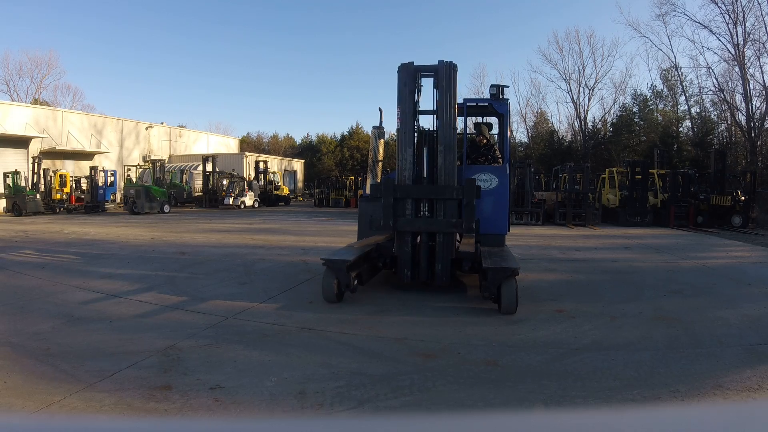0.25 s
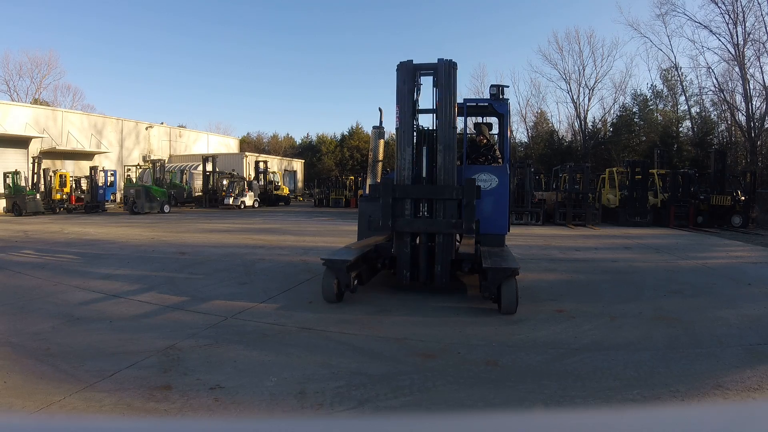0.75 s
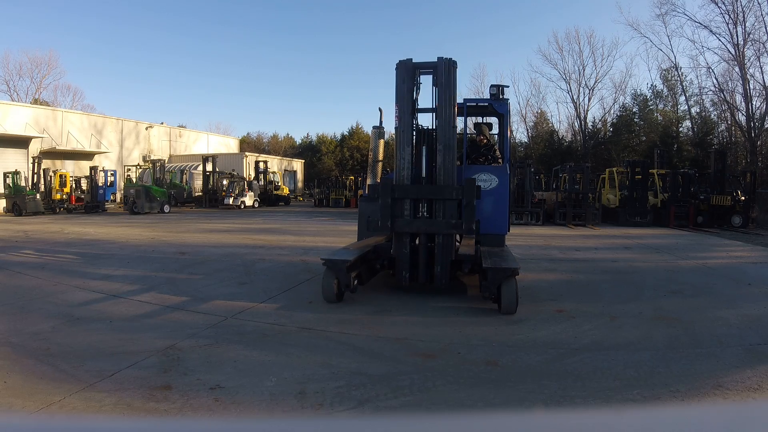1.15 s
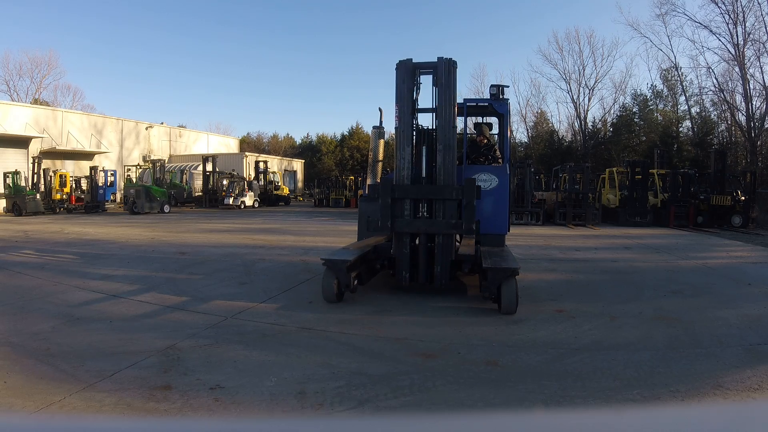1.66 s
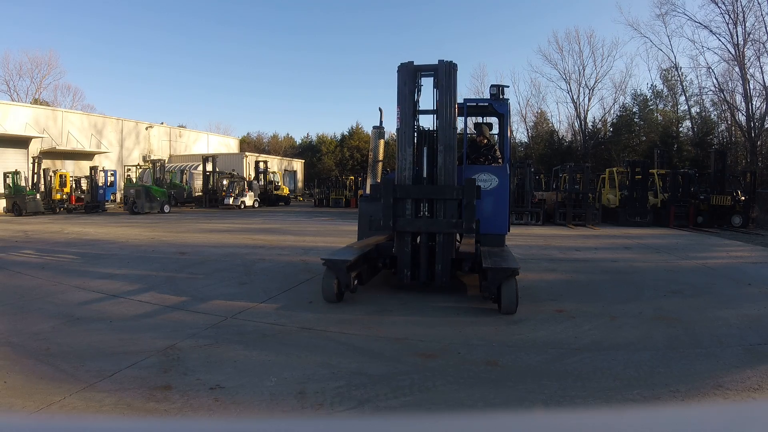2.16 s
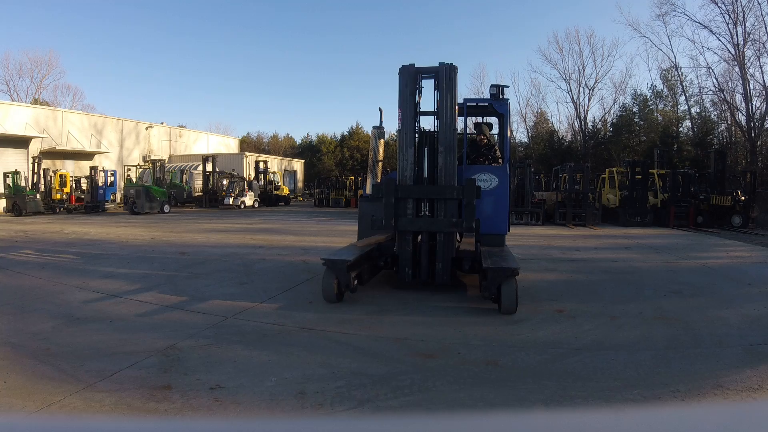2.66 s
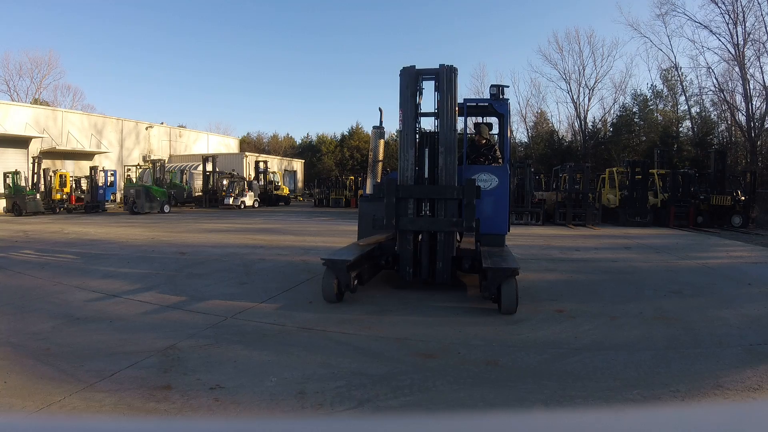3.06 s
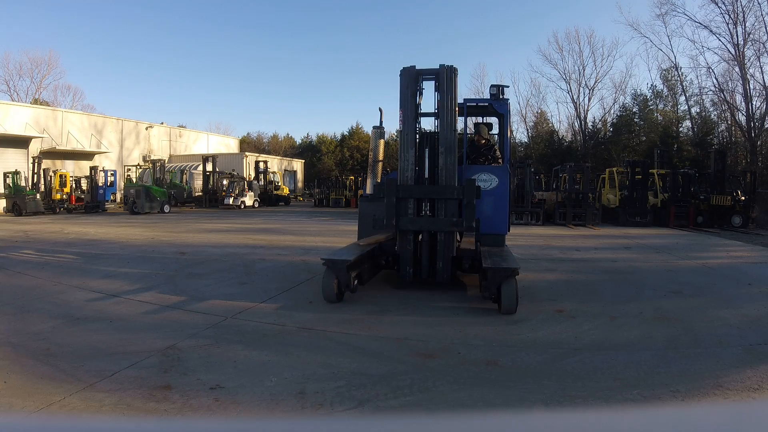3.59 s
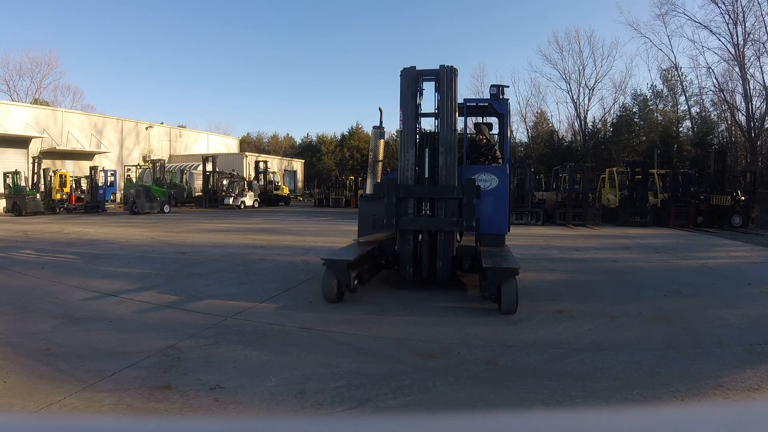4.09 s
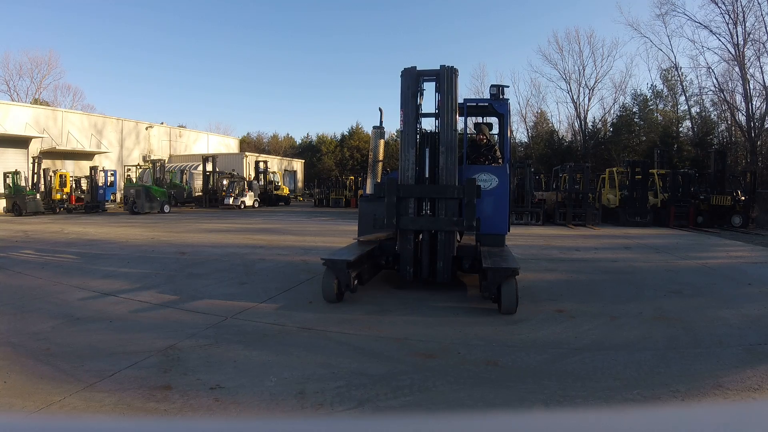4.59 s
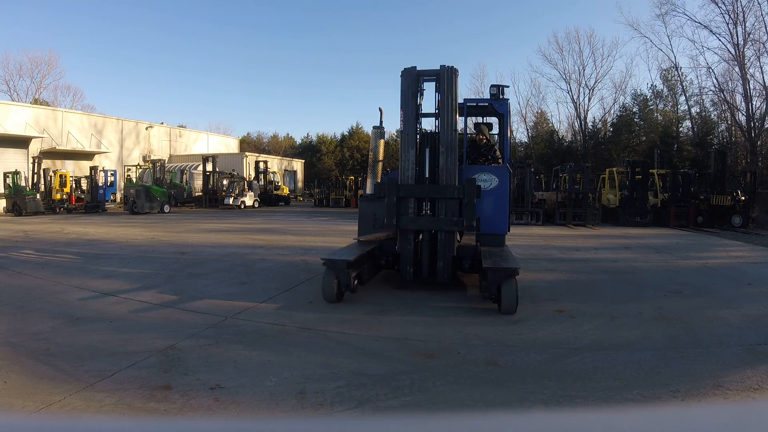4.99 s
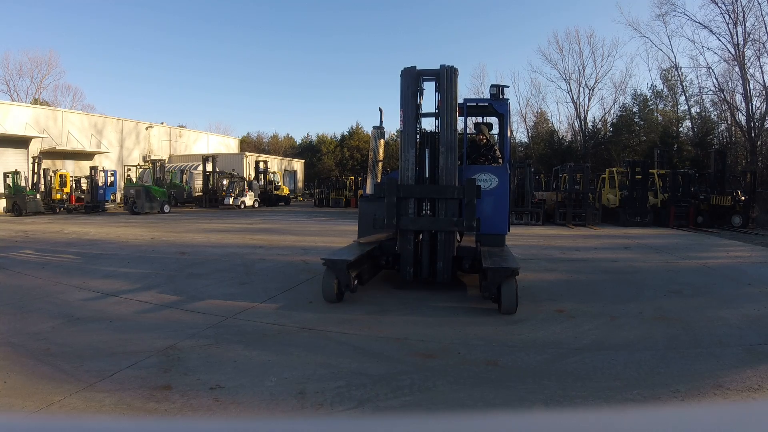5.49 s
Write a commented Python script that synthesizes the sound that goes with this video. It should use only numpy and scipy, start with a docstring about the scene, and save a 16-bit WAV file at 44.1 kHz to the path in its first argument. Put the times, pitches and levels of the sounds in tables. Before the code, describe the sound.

A forklift's diesel engine drones fast and steady with a whining pump, then strains, revs, nearly stalls and recovers in an outdoor yard.

```python
"""A fast, steady engine boom comes first, with fan hum, pump whine, knock and oil hiss: a forklift in a yard.
Small mast clicks follow as the hydraulics work; the engine sags, revs again, nearly stalls and recovers.
Boom, hum, whine and gears are sines locked to one crankshaft; knock is noise in a burst at each firing.
Rumble, fan air, valve chatter and oil are coloured noise; clicks are ringing bands of noise.
Machinery rings through steel resonances; knock, oil and clicks also reflect in the yard."""
import sys
import numpy as np
from scipy import signal
from scipy.fft import rfft, irfft
from scipy.io import wavfile

SR = 44100
rng = np.random.default_rng(int(sys.argv[2]) if len(sys.argv) > 2 else 0)


def materialize(psi):
    """Save the field psi as 16-bit PCM at rate SR to the path in sys.argv[1].

    A 1-D psi becomes a single channel; in a 2-D psi each row is a channel.
    """
    bounded = np.clip(np.atleast_2d(psi).T, -1, 1)
    quanta = np.round(bounded * 32767).astype(np.int16)
    wavfile.write(sys.argv[1], SR, quanta)


N = 253134
TIME = np.arange(N) / SR
BINS = np.fft.rfftfreq(N, 1 / SR)

# engine speed: (t/s, firing rate f/Hz)
SPEED = [(0.0, 99.8), (1.2, 99.6), (1.45, 102.9), (1.69, 103.7), (1.84, 94.6), (2.13, 88.8), (2.78, 86.5),
         (3.18, 88.3), (3.56, 101.0), (3.95, 104.9), (4.08, 92.8), (4.25, 81.2), (4.43, 59.9), (4.6, 51.1),
         (4.77, 76.2), (5.03, 92.4), (5.35, 79.3), (5.74, 73.3)]
# load on the engine: (t/s, share of full load 0-1)
LOAD = [(0, 0.23), (1.1, 0), (1.85, 0.25), (2.15, .65), (2.8, 0.74), (3.25, .92), (3.6, 0.75), (3.9, 0.9),
        (5.3, 1), (5.74, .88)]

# A level law is (level/dB at governed speed without load, dB per doubling of speed, dB added by full load).
# A colour is (f/Hz, relative density level/dB); an order is a multiple of the named rate.

# exhaust boom: (multiple of the crank rate, level/dB without load, dB added by full load)
BOOM_ORDERS = [(1, -29, 9), (2, -26.5, 10.5), (3, -34, 12.5)]
# exhaust pipe resonance: (f/Hz, level/dB)
PIPE = [(27, -11), (38, -9), (50, -11.5), (63, -10), (76, -1.5), (83, 0), (90, -.3), (94, -4), (100, -7),
        (112, -11), (130, -19), (155, -15)]
# wavering of the boom from uneven burning: (depth/dB, rate f/Hz)
WAVER = (0.59, 14)
# weaker engine lines between and above the boom: level law
CYCLE_LINES = (-48, -9, 0.93)
# weaker engine lines: (multiple of the four-stroke cycle rate, relative level/dB)
CYCLE_ORDERS = [(3, -3), (5, -4.5), (7, -0.5), (8, 0), (9, -17), (10, -9), (11, -8.5), (12, -4),
                (24, -10.5)]
# engine bay rumble: level law, then colour
RUMBLE = (-36.5, 3.8, .3)
RUMBLE_COLOUR = [(10, -20), (22, -3), (45, -4.5), (70, -9), (120, -5), (160, 0), (200, -1), (245, -10),
                 (300, -17), (380, -28), (700, -50)]
# droning panel: (f/Hz, flutter rate f/Hz, level/dB before flutter)
PANEL = (156, 1.6, -43)
# fan blade tones: level law
HUM = (-45.5, 17.6, -1.5)
# fan blade tones: (multiple of the blade rate, relative level/dB without load, dB added by full load)
FAN_ORDERS = [(1, 0, -.5), (2, -6.5, 4.5), (3, -12.5, 0), (4, -15, 0.5)]
# fan shroud resonance: (centre f/Hz, half width f/Hz, dB added)
SHROUD = (327, 63, 7.8)
# fan air: level law, then colour
ROAR = (-39.5, 10.8, -0.33)
ROAR_COLOUR = [(150, -29), (290, 4.5), (400, -2.5), (520, -4), (680, -3), (900, -8.5), (1300, -13),
               (1700, -21), (2100, -24.5), (2700, -26), (3400, -35.5), (4300, -39.5), (8000, -40.5)]
# pump whine: level law
WHINE = (-50.5, 6.1, -1.7)
# pump body: (multiple of the stroke rate, relative level/dB)
PUMP_ORDERS = [(1, -2), (2, -12), (4, -13), (5, -12.5), (6, -14), (8, -27), (11, -31), (13, -42), (20, -38),
               (21, -33), (23, -30), (31, -34)]
# pump housing resonance: (firing rate f/Hz, half width f/Hz, dB added)
HOUSING = (99.4, 2.7, 7)
# oil pressure ripple: level law
RIPPLE = (-75.5, 15, -1.2)
# oil pressure ripple: (multiple of the stroke rate, relative level/dB)
RIPPLE_ORDERS = [(4, 9.5), (6, 6), (11, -7.5), (12, -10), (13, -8), (17, -18), (19, -17), (20, -2.5),
                 (21, -7), (22, -5), (23, -6.5), (25, -5.5)]
# steel resonance that the ripple partials cross: (centre f/Hz, half width f/Hz, dB added)
STEEL_MODE = (6130, 180, 7.8)
# hydraulics at work raise the ripple: (start t/s, end t/s, dB added)
STROKES = [(1.33, 1.95, 7), (3.38, 3.8, 7)]
# gear whine: (multiple of the firing rate, relative level/dB)
GEAR_ORDERS = [(4.5, 21), (6, 13.5), (7.7, 12.5), (12.1, 12), (33, -11), (40, -7.5), (42, -3), (66.6, 5.5),
               (71, 4.5), (78.8, -4)]
# gears sing through the first heavy pull: (start t/s, end t/s, reference level/dB)
GEAR_PULL = (2.0, 4.3, -75)
# valve train chatter: colour
CHATTER_COLOUR = [(400, -19), (700, 5), (1000, -6), (1600, 2), (2100, -7.5), (2400, -9), (3000, -27),
                  (4300, -31)]
# piston knock: level law, then colour
KNOCK = (-60.5, -1, 0.79)
KNOCK_COLOUR = [(400, -26), (1100, -13), (1700, 10), (2100, 1.5), (2650, 6), (3200, 0), (4300, -20),
                (5900, -6.5), (6600, -28), (8000, -2), (11000, -12), (12000, -40)]
# knock of each cylinder in firing order: (relative level/dB)
CYLINDERS_DB = [-6, 0, -7, -1.5]
# oil flow: level law, then colour
HISS = (-55, -1.8, .4)
HISS_COLOUR = [(2000, -0.5), (3300, -7.5), (4300, -17.5), (4900, -8), (5500, -0.5), (6050, 3), (6550, -0.5),
               (7300, 3), (8500, -5), (9400, -4.5), (10900, -11.5), (11700, -19), (13500, -17),
               (15200, -28)]
# oil squirt through a valve: (peak level/dB, attack t/s, decay t/s), then colour
SQUIRT = (-51, 0.036, 0.06)
SQUIRT_COLOUR = [(2000, -14), (3800, -16), (5200, 7), (8500, 1.5), (10000, -7), (12000, -31)]
# oil fizz through the second pull, on past the end of the scene: (start t/s, end t/s, level/dB), then colour
FIZZ_PULL = (4.2, 7.4, -64)
FIZZ_COLOUR = [(7000, -10), (9300, -4), (10700, -2), (11800, -22), (13500, -16), (15000, -26)]
# steel panels and mast: (f/Hz, width f/Hz, level/dB of the ring against the direct sound)
FRAME = [(455, 25, -7), (560, 25, -10), (680, 40, -9), (850, 40, -9), (1060, 30, -9), (1230, 30, -8),
         (2265, 50, -9), (2610, 70, -4), (2940, 70, -8), (3297, 30, -3), (3490, 40, -8), (3740, 40, -11),
         (5280, 80, -11), (5855, 80, -5), (6160, 110, -4), (6900, 70, -12), (7500, 50, -9),
         (7950, 120, -12), (9320, 110, -11)]
# mast and linkage clicks: (t/s, level/dB, ring f/Hz, half width in octaves, t60 t/s)
CLICKS = [(1.2374, -39, 6060, .16, 0.027), (1.239, -44, 9100, .1, 0.026), (1.238, -47, 2980, 0.18, 0.046),
          (1.69, -43, 1800, 0.17, 0.09), (1.689, -42, 2220, 0.13, 0.073), (4.042, -44.5, 7970, .015, 0.077),
          (4.354, -38, 7760, 0.065, 0.037), (4.573, -49, 5800, .12, 0.045), (4.622, -48, 6500, 0.22, 0.042)]
# near a stall: (firing rate f/Hz where it begins, dip level/dB, throb level/dB)
LUGGING = (60, -2.4, 2.1)

GOVERNED_HZ = 100  # firings a second
CYLINDERS = 4  # firings in a four-stroke cycle
BLADES_PER_FIRING, STROKES_PER_FIRING = 3.165, 3
PIPE_LAG_S, FUEL_LAG_S, EASE_S, FADE_S = 0.023, 0.1, 0.033, 0.008
INJECTION_LAG, THROB_LAG = 0.64, 0.3  # in firings
PICKUP_DB = 6.5  # knock added per 100 firings/s gained in a second
PICKUP_CONTRAST = 2.1  # share added to the weak cylinders' dB shortfall, at the same pickup
KNOCK_SCATTER_DB, BUFFET_DB, CHATTER_DB = 1.4, -23, -54.5
SQUIRT_S = 4.82  # time of the peak
EDGE_HZ = 15200


def amp(db):
    """Turns decibels into gain."""
    return 10 ** (np.asarray(db) / 20)


def unit(x):
    """Scales to rms 1."""
    return x / np.sqrt(np.mean(x ** 2) + 1e-20)


def curve(rows):
    """Draws a time table out to every sample."""
    return np.interp(TIME, *np.transpose(rows))


def noise(gain):
    """Noise of rms 1 with a gain for each frequency."""
    return unit(irfft(rfft(rng.standard_normal(N)) * gain, N))


def coloured(points):
    """Noise with a drawn spectrum, held flat below its first point and falling away above its last."""
    hz, db = np.transpose(points)
    spectrum = amp(np.interp(np.log(BINS + 1), np.log(hz), db))
    skirt = 1 / (1 + (BINS / hz[-1]) ** 4)
    return noise(spectrum * np.minimum(2 * skirt, 1))


def drift(hz):
    """Slow random movement of rms 1, up to about the given rate."""
    count = N // 16  # a coarse grid is enough
    rates = np.fft.rfftfreq(count, N / SR / count)
    smooth = np.exp(-.5 * (rates / hz) ** 2)
    slow = irfft(rfft(rng.standard_normal(count)) * smooth, count)
    return np.interp(TIME, np.linspace(0, TIME[-1], count), unit(slow))


def partials(turns, orders, flutter_db, smear, flutter_hz):
    """Tones locked to a shaft, each wavering in level and in phase (smear in radians)."""
    out = np.zeros(N)
    for order, db in orders:
        angle = 2 * np.pi * (order * turns + rng.random()) + smear * drift(flutter_hz)
        gain = amp(db + flutter_db * drift(flutter_hz))
        out += gain * np.sqrt(2) * np.sin(angle)
    return out


def level(law):
    """Gain of a sound that follows the engine's speed and load."""
    db, speed_db, load_db = law
    doublings = np.log2(curve(SPEED) / GOVERNED_HZ)
    return amp(db + speed_db * doublings + load_db * curve(LOAD))


def spell(start, end):
    """Eases from 0 to 1 around the start, holds, and eases back around the end."""
    return np.clip(.5 + .5 * np.minimum(TIME - start, end - TIME) / EASE_S, 0, 1)


def flare(hz, resonance):
    """Gain of a moving frequency as it crosses a resonance."""
    centre_hz, width_hz, db = resonance
    return amp(db / (1 + ((hz - centre_hz) / width_hz) ** 2))


def boom_gain(order, db, load_db):
    """A crank order grows with load; the pipe's swell and fade trail the speed slightly."""
    late_speed = np.interp(TIME - PIPE_LAG_S, *np.transpose(SPEED))
    hz = order * late_speed / 2  # two firings to a crank turn
    return amp(db + load_db * curve(LOAD) + np.interp(hz, *np.transpose(PIPE)))


def exhaust(firings):
    """The pipe booms at the lowest crank orders; the engine adds weaker lines between and above them."""
    waver_db, waver_hz = WAVER
    boom = np.zeros(N)
    for order, db, load_db in BOOM_ORDERS:
        tone = np.sqrt(2) * np.sin(np.pi * order * firings)
        boom += boom_gain(order, db, load_db) * amp(waver_db * drift(waver_hz)) * tone
    cycles = firings / CYLINDERS
    lines = partials(cycles, CYCLE_ORDERS, flutter_db=3.5, smear=0.46, flutter_hz=10)
    return boom + level(CYCLE_LINES) * lines


def body():
    """Low rumble of the engine bay, gas buffeting that grows with the boom, and one droning panel."""
    hz, flutter_hz, db = PANEL
    panel = amp(db) * partials(TIME, [(hz, 0)], flutter_db=5, smear=1.0, flutter_hz=flutter_hz)
    gas = coloured([(12, -7), (25, -30), (50, 26), (90, 19), (200, -32)])
    buffet = boom_gain(*BOOM_ORDERS[1]) * amp(BUFFET_DB) * gas
    rumble = level(RUMBLE) * coloured(RUMBLE_COLOUR)
    return rumble + panel + buffet


def fan(firings):
    """The belt-driven fan: blade tones flare in the shroud, and the blades chop turbulent air a little."""
    blades = BLADES_PER_FIRING * firings
    blade_hz = BLADES_PER_FIRING * curve(SPEED)
    hum = np.zeros(N)
    for order, db, load_db in FAN_ORDERS:
        tone = partials(blades, [(order, db)], flutter_db=.6, smear=.07 * order, flutter_hz=5)
        hum += amp(load_db * curve(LOAD)) * flare(order * blade_hz, SHROUD) * tone
    chop = amp(np.sin(2 * np.pi * blades) + 0.25 * drift(17))
    air = coloured(ROAR_COLOUR) * chop
    return level(HUM) * hum + level(ROAR) * air


def pump(firings):
    """Pump strokes whine; pressure brings out high partials that flare as they cross a steel resonance, and
    gears sing."""
    strokes = STROKES_PER_FIRING * firings
    stroke_hz = STROKES_PER_FIRING * curve(SPEED)
    body_tones = partials(strokes, PUMP_ORDERS, flutter_db=1.3, smear=.2, flutter_hz=5)
    whine = level(WHINE) * flare(curve(SPEED), HOUSING) * body_tones

    ripple = np.zeros(N)
    for order, db in RIPPLE_ORDERS:
        tone = partials(strokes, [(order, db)], flutter_db=1.6, smear=.4, flutter_hz=12)
        ripple += flare(order * stroke_hz, STEEL_MODE) * tone
    pressure = amp(sum(db * spell(start, end) for start, end, db in STROKES))

    start, end, gear_db = GEAR_PULL
    gears = partials(firings, GEAR_ORDERS, flutter_db=1.0, smear=0.4, flutter_hz=34)
    return whine + level(RIPPLE) * pressure * ripple + amp(gear_db) * spell(start, end) * gears


def valves(firings, throb_db=1.5):
    """The valve train chatters twice a firing, and keeps its level when the fan slows."""
    throb = throb_db * np.sin(4 * np.pi * firings)
    return amp(CHATTER_DB + throb) * coloured(CHATTER_COLOUR)


def knock(firings, ring_s=0.009):
    """Each firing rattles the block in a short burst; extra fuel during pickup hardens the knock."""
    speed = curve(SPEED)
    burns = firings - INJECTION_LAG
    stroke = np.floor(burns).astype(int)
    age = (burns % 1) / speed  # seconds since the last burn

    # rising speed only, smoothed so that the extra fuel lingers
    gain_in_speed = np.maximum(np.gradient(speed, TIME), 0) / GOVERNED_HZ
    keep = np.exp(-1 / (FUEL_LAG_S * SR))
    pickup = signal.lfilter([1 - keep], [1, -keep], gain_in_speed)

    # weak cylinders fall further behind under pickup
    cylinder_db = np.array(CYLINDERS_DB)[stroke % CYLINDERS] * (1 + PICKUP_CONTRAST * pickup)
    scatter_db = KNOCK_SCATTER_DB * rng.standard_normal(N)[stroke]
    bursts = unit(amp(cylinder_db + scatter_db) * np.exp(-age / ring_s))
    return level(KNOCK) * amp(PICKUP_DB * pickup) * bursts * coloured(KNOCK_COLOUR)


def sputtering(points):
    """Hiss that sputters as bubbles collapse, drawn as random swings in level."""
    swings = unit(amp(0.44 * drift(250) + 0.93 * drift(22)))
    return swings * coloured(points)


def oil():
    """Oil flows, squirts and fizzes through the valves as sputtering noise."""
    flow = level(HISS) * sputtering(HISS_COLOUR)

    squirt_db, attack_s, decay_s = SQUIRT
    away = np.maximum((SQUIRT_S - TIME) / attack_s, (TIME - SQUIRT_S) / decay_s)
    squirt = amp(squirt_db) * np.exp(-away) * sputtering(SQUIRT_COLOUR)

    start, end, fizz_db = FIZZ_PULL
    fizz = amp(fizz_db) * spell(start, end) * sputtering(FIZZ_COLOUR)
    return flow + squirt + fizz


def frame(x):
    """Fixed steel resonances ring along; a gliding partial flares as it crosses one."""
    response = 1 + sum(amp(db) / (1 + 2j * (BINS - hz) / width_hz) for hz, width_hz, db in FRAME)
    return irfft(rfft(x) * response, N)


def yard(x, echo_db=-13, count=10):
    """A few early reflections from the paving and the truck's own sides, within 27 ms."""
    taps = np.zeros(round(0.027 * SR))
    places = rng.integers(len(taps) // 20, len(taps), count)
    taps[places] = rng.choice([-1, 1], count) / np.sqrt(count)
    return x + amp(echo_db) * signal.oaconvolve(x, taps)[:N]


def clicks(rise_s=0.00064):
    """Steel parts take up their play, each ringing briefly in its own band."""
    out = np.zeros(N)
    for start, db, hz, octaves, t60 in CLICKS:
        age = np.maximum(TIME - start, 0)
        ring = noise(1 / (1 + (np.log2((BINS + 1) / hz) / octaves) ** 2))
        attack = 1 - np.exp(-age / rise_s)
        decay = np.exp(-np.log(1000) * age / t60)
        out += amp(db) * ring * attack * decay
    return out


def lugging(firings):
    """Near a stall the crank turns in lurches, and the machinery sinks and throbs with it."""
    below_hz, dip_db, throb_db = LUGGING
    depth = np.clip((below_hz - curve(SPEED)) / 10, 0, 1)
    throb = throb_db * np.cos(np.pi * (firings - THROB_LAG))  # once a crank turn
    return amp(depth * (dip_db + throb))


def scene():
    """Everything that turns follows the one crankshaft."""
    firings = np.cumsum(curve(SPEED)) / SR
    turning = fan(firings) + pump(firings) + valves(firings)
    reflected = yard(knock(firings) + oil())
    machinery = frame(lugging(firings) * (turning + reflected))
    mix = exhaust(firings) + body() + machinery + yard(clicks())
    return mix[None]


def record(dry):
    """Soft ends and an upper band limit."""
    faded = dry * signal.windows.tukey(N, 2 * FADE_S * SR / N)
    lowpass = signal.firwin(511, EDGE_HZ, window=("kaiser", 9), fs=SR)
    return signal.oaconvolve(faded, lowpass[None], "same")


dry = scene()
out = record(dry)
materialize(out)
```